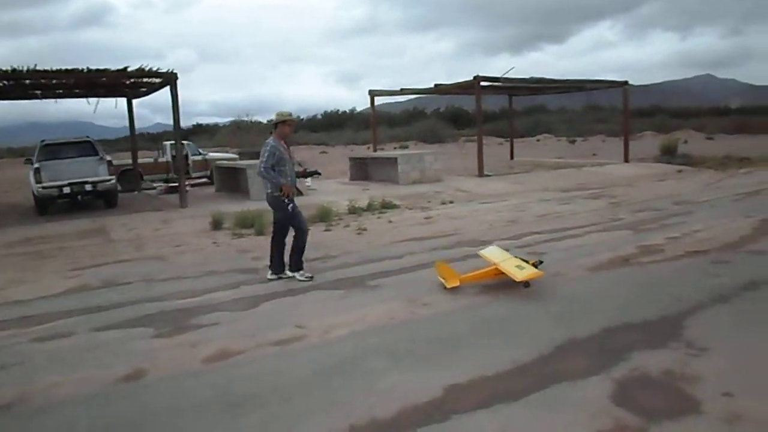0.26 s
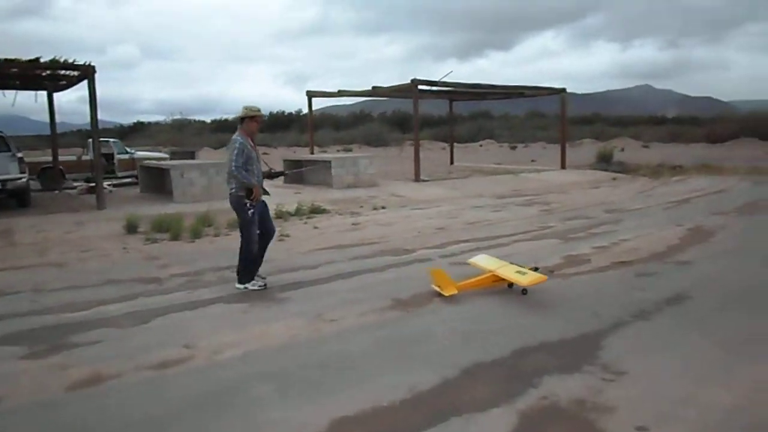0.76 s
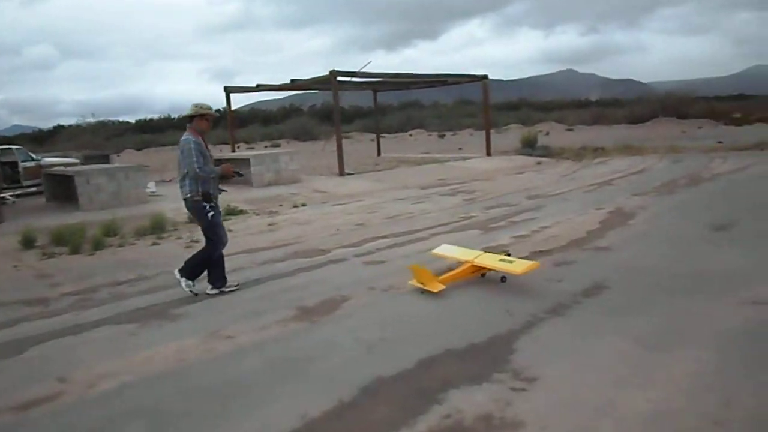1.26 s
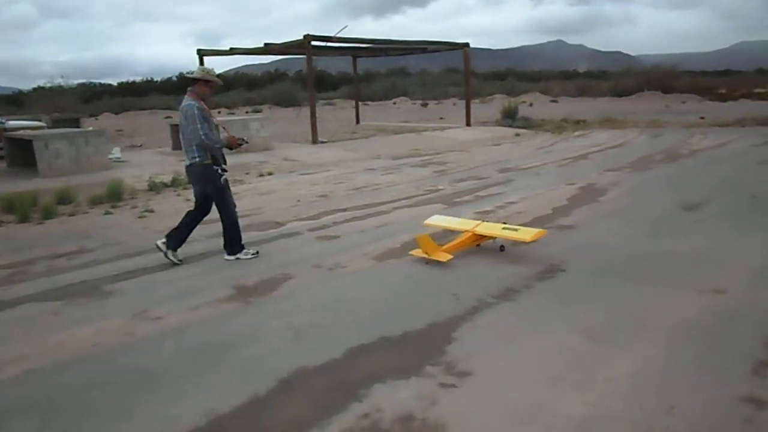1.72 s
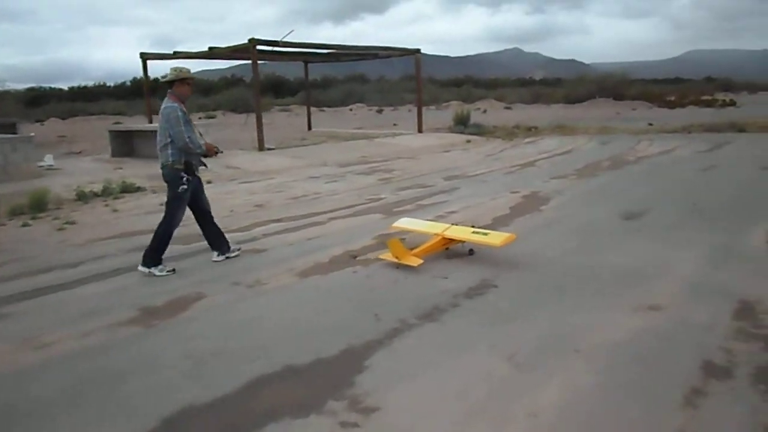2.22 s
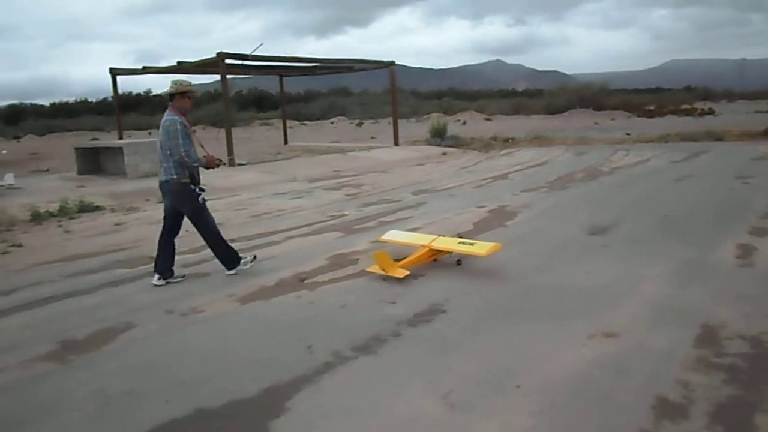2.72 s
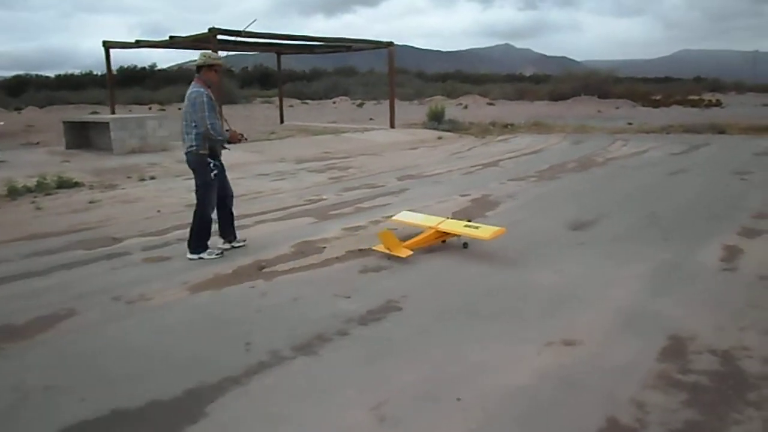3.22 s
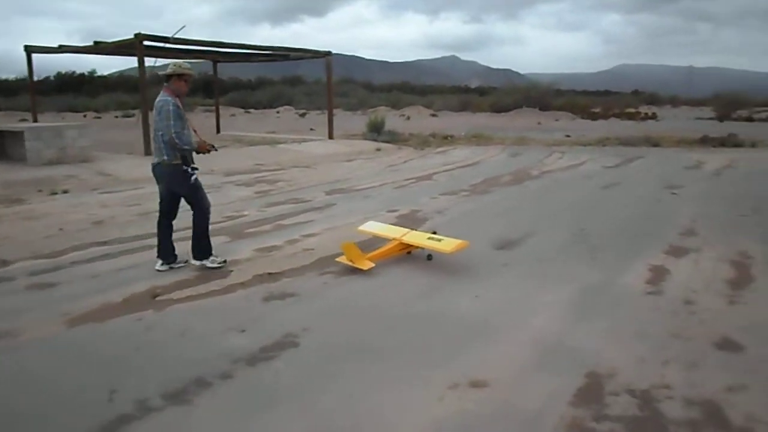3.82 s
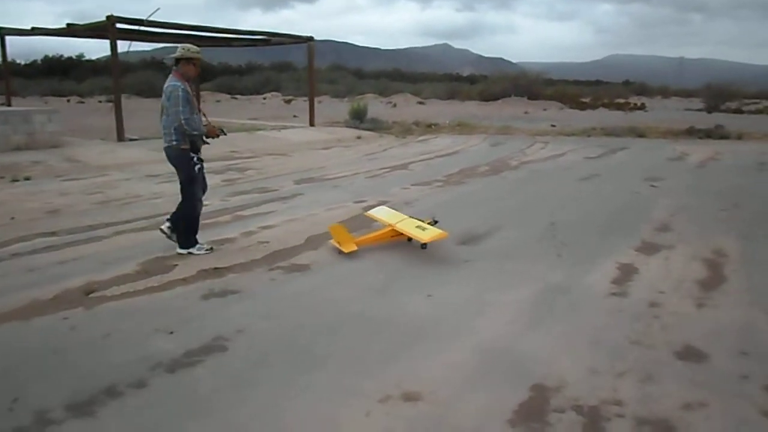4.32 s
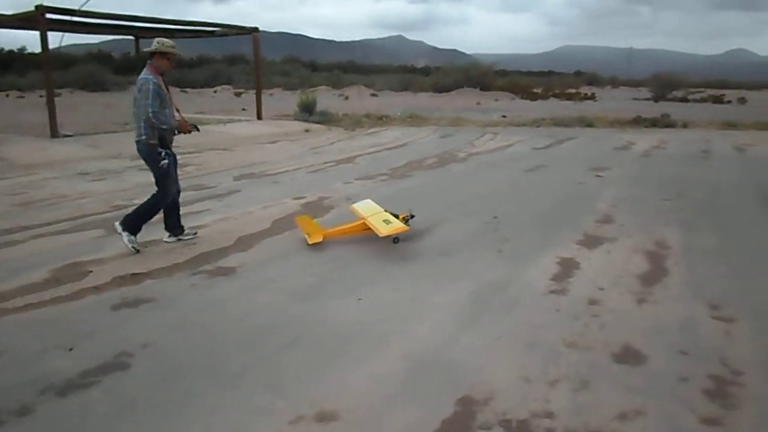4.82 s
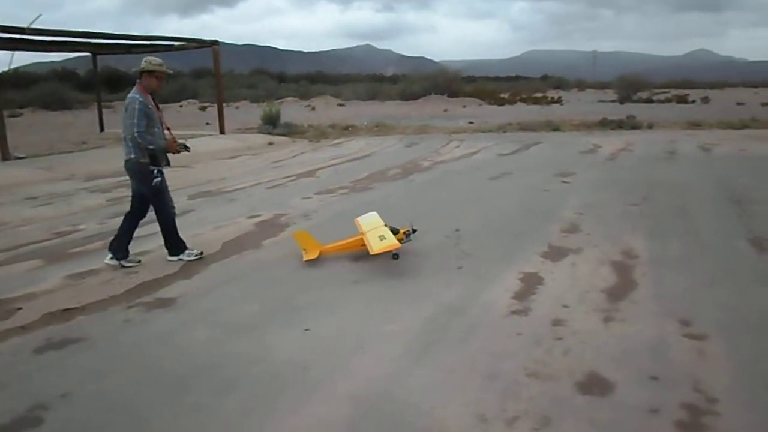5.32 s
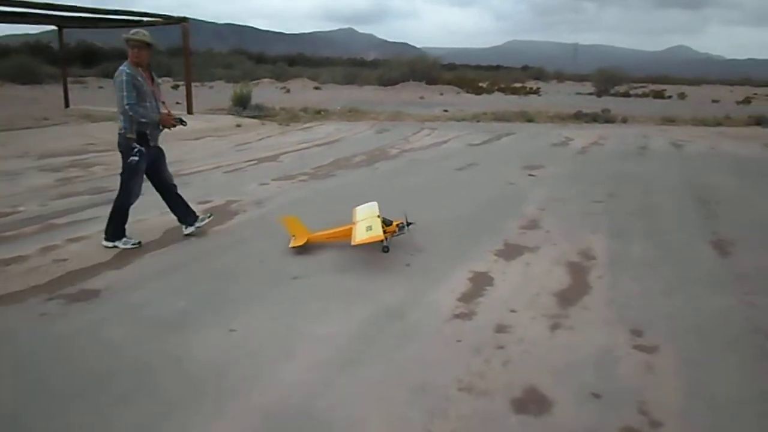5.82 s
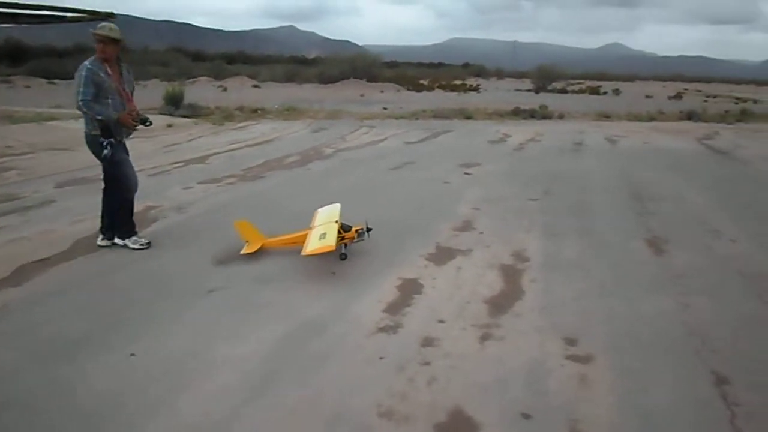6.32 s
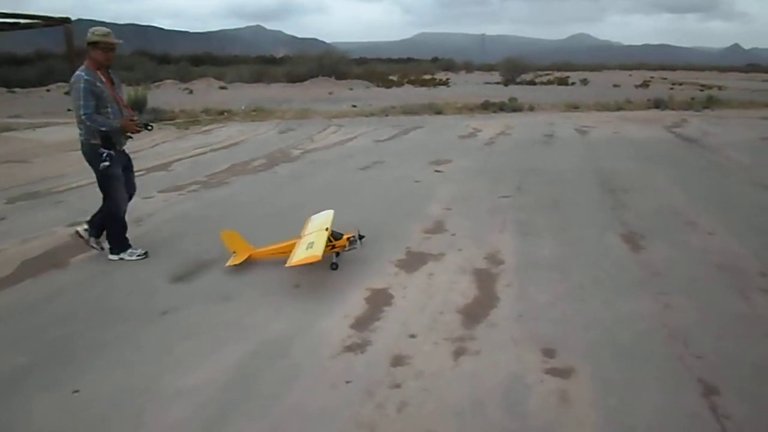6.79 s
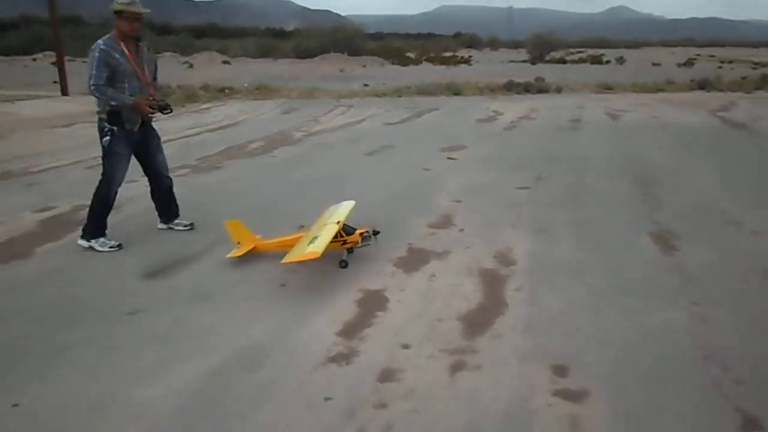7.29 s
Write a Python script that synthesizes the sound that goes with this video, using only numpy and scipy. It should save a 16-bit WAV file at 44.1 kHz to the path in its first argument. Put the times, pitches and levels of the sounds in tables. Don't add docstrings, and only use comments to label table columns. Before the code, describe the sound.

Rough, popping little model engine idles and surges on open ground, growing more rattly side-on, under buffeting gusts, finger knocks and a final muffled treble loss.

```python
import sys
import numpy as np
from scipy import signal
from scipy.fft import rfft, irfft, next_fast_len
from scipy.io import wavfile
from scipy.ndimage import uniform_filter1d, map_coordinates

SR = 44100
rng = np.random.default_rng(int(sys.argv[2]) if len(sys.argv) > 2 else 0)


def convert_level_to_amplitude(level_db):
    exponent = np.asarray(level_db, float) / 20
    return 10 ** exponent


def to_wav(s):
    ch = np.atleast_2d(s).T
    pcm = np.round(np.clip(ch, -1, 1) * 32767)
    wavfile.write(sys.argv[1], SR, pcm.astype(np.int16))


N = 332989
T = np.arange(N) / SR

# first t/s, last t/s, spacing/turns
STRONG_RUNS = [(.014, .036, 2), (.079, .165, 4), (.187, .218, 3), (.282, .314, 3), (.356, .419, 3),
               (.462, .504, 4), (.526, .559, 3), (1.232, 1.2636, 2), (1.356, 1.385, 2), (1.429, 1.4728, 3),
               (1.6266, 1.6404, 1), (1.696, 1.7103, 1), (1.9447, 2.0264, 5), (2.0595, 2.0933, 2),
               (2.1267, 2.1761, 1), (2.2438, 2.2601, 1), (2.4616, 2.4929, 2), (2.522, 2.563, 3),
               (2.588, 2.6127, 2), (2.6357, 2.6804, 2), (2.7126, 2.7747, 2), (2.805, 2.8354, 3),
               (2.8557, 2.886, 3), (3.142, 3.167, 2), (3.191, 3.2144, 2), (3.2374, 3.303, 2),
               (3.813, 3.928, 3), (4.7344, 4.7825, 2), (4.8162, 4.8378, 2), (4.8588, 4.8898, 3),
               (4.911, 4.9434, 3), (5.0344, 5.1047, 2), (5.1382, 5.1711, 3), (5.2029, 5.2335, 3),
               (5.253, 5.2908, 2), (5.3096, 5.3283, 1), (5.3468, 5.3746, 3), (5.771, 5.7865, 1),
               (5.915, 5.982, 4), (6.0327, 6.0672, 2), (6.118, 6.1684, 3), (6.2356, 6.2526, 1),
               (6.3029, 6.3353, 1), (6.3665, 6.3964, 2), (6.4404, 6.4547, 1), (6.4956, 6.6024, 4),
               (6.6407, 6.6668, 2)]
LONE_FIRINGS = [.6166, .849, .9273, 1.0108, 1.08, 1.1486, 1.199, 1.3102, 1.5154, 1.5567, 1.5987, 1.88,
                2.3278, 3.335, 3.772, 4.6217, 4.68, 4.9993, 5.2133, 5.403, 5.833, 6.5757, 6.7195]
# f/Hz, density/dB per Hz
TURBULENCE = [(150, -55), (230, -4), (350, -2), (550, -11.5), (900, -21.5), (1700, -39.5), (2500, -77)]


def unit(x):
    return x / np.sqrt(np.mean(x ** 2) + 1e-20)


def curves(rows):
    s, *cols = np.transpose(rows)
    return [np.interp(T, s, c) for c in cols]


def wobble(rate):
    return map_coordinates(rng.standard_normal(int(N * rate / SR) + 4), [T * rate])


def white():
    return rng.standard_normal(N)


def filtered(x, response):
    m = next_fast_len(N + SR // 2)
    return irfft(rfft(x, m) * response(np.fft.rfftfreq(m, 1 / SR)), m)[:N]


def shape(points):
    f, db = np.transpose(points)
    return lambda hz: convert_level_to_amplitude(np.interp(np.log(hz + 1), np.log(f + 1), db, left=-120, right=-120))


def causal(points, lean=1):
    def response(hz):
        cepstrum = irfft(np.log(shape(points)(hz) + 0.002))
        cepstrum[1:len(hz) - 1] *= 2
        cepstrum[len(hz):] = 0
        z = rfft(cepstrum)
        return np.exp(z.real + 1j * lean * z.imag)
    return response


def modes(table):
    def response(f):
        total = 0
        for k, (centre, width, db) in enumerate(table):
            damping = 1j * f * width
            total = total + (-1) ** k * convert_level_to_amplitude(db) * damping / (centre * centre - f * f + damping)
        return total
    return response


def noise(points):
    return unit(filtered(white(), shape(points)))


def steady(x, seconds):
    return x / np.sqrt(np.abs(uniform_filter1d(x ** 2, int(seconds * SR))) + 1e-12)


def swells(s, db, rise, fall):
    t = T[::32]
    total = 0
    for at, peak_db, up, down in zip(s, db, rise, fall):
        total = total + convert_level_to_amplitude(peak_db - 10 * np.maximum((at - t) / abs(up), (t - at) / abs(down)))
    return np.interp(T, t, total)


def engine():
    # t/s, share of the side view
    heading = [
        (4.2, 0.026),
        (4.8, 0.88),
    ]
    # t/s, pop level/dB, aim of the muffler/dB
    loudness = [(0, -56.5, 3), (.5, -51.5, 5), (.95, -51, -3), (1.65, -48.5, 1), (2.4, -51, 0.5),
                (2.62, -45, 2), (3.3, -46.5, 1.5), (3.69, -42, 2), (3.77, -39.5, -11), (4.3, -48.5, -7),
                (4.98, -43.5, -3.5), (5.36, -42, 1.5), (5.56, -42.5, -8), (6.03, -46.5, -1.5),
                (6.7, -40, -0.5), (7.02, -42, -6.5), (7.16, -52, 0), (7.55, -52, 9)]
    # t/s, burn of the charges/dB, draw of the intake/dB
    mixture = [(0, 6, 1.5), (.6, 4.5, 1), (1.2, 0.5, -3), (1.6, 1, -0.5), (2.3, 3, -0.5), (3.3, 3.5, 1.5),
               (3.42, -0.5, -1), (3.7, 1.5, -3.5), (4.0, -2.5, 0), (4.5, 0.5, -1.5), (5.0, 1, 2),
               (5.3, 2, -1.5), (5.42, -5, 0), (5.9, 1.5, 0), (6.1, 3, -0.5), (6.75, 3, 0.5), (7.0, -3, 3.5),
               (7.55, -20, 7)]
    # t/s, share of the intake in sight
    intake_view = [
        (0, 0.66),
        (.6, 0.42),
        (.68, 0),
        (4.2, 0),
        (4.8, 0.55),
        (7.1, 0.43),
        (7.16, 0.029),
    ]
    beside, = curves(heading)
    pop_db, aim_db = curves(loudness)
    burn_db, draw_db = curves(mixture)
    in_sight, = curves(intake_view)

    speed, turns = crank()
    fire = unit(firings(turns))
    opening = np.diff(np.floor(turns + .02), prepend=0) > 0
    ports = unit(opening * convert_level_to_amplitude(1.7 * wobble(66)))
    throttle_db = .09 * np.interp(T - .07, T, np.gradient(speed) * SR)
    burn = convert_level_to_amplitude(np.clip(throttle_db, -10, 1.5) + burn_db)
    blow = -np.roll(fire, round(.00205 * SR)) + .4 * unit(puffs(fire, .03, fill_db=2) * white())
    gulp = -ports + (.47 - .36 * in_sight + .3 * burn) * white()

    pop = exhaust_pop(blow, burn) + convert_level_to_amplitude(draw_db) * intake(gulp, in_sight)
    pop += convert_level_to_amplitude(-1.5) * wing_panel(blow, speed) + singing_intake(ports) + crack(fire, burn, beside)
    shake = cowl_slaps(fire, burn, ports)
    ring_db, rattle_db, hiss_db, hum_db = layers(beside)
    parts = pop + convert_level_to_amplitude(ring_db + aim_db) * muffler_ring(burn * blow + 2.1 * gulp, beside)
    parts += convert_level_to_amplitude(rattle_db) * cowl_rattle(shake) + convert_level_to_amplitude(hiss_db) * jet_hiss(shake, beside)
    return convert_level_to_amplitude(pop_db) * (parts + convert_level_to_amplitude(hum_db) * airframe_hum(speed, turns))


def crank():
    # t/s, speed the crank heads for/turns per s
    throttle = [(0.0, 93.4), (0.508, 56.8), (1.064, 67.6), (1.255, 74.0), (1.559, 59.4), (2.408, 106.1),
                (2.807, 62.3), (3.057, 106.9), (3.267, 61.2), (3.656, 92.9), (4.063, 57.2), (4.48, 78.8),
                (4.643, 110.6), (4.854, 68.9), (5.024, 117.5), (5.323, 58.5), (6.236, 80.4), (6.625, 55.6),
                (7.107, 83.4), (7.361, 62.5)]
    beats = [.6532, .746, 1.0455, 1.7543, 3.453, 3.5494, 3.578, 3.622, 3.757, 4.0533, 4.1545, 4.2426, 4.446,
             5.454, 6.85, 6.9466, 7.0427, 7.2468, 7.4389]
    s, aim = np.transpose(throttle)
    u = np.clip(T - s[1:, None], 0, None) / .1223
    speed = aim[0] + np.diff(aim) @ (1 - (1 + u) * np.exp(-u))
    turns = np.cumsum(speed) / SR
    s = np.unique([*np.transpose(STRONG_RUNS)[:2].flat, *beats, *LONE_FIRINGS])
    at = np.interp(s, T, turns)
    whole = np.cumsum(np.round(np.diff(at, prepend=0)))
    return speed, turns + uniform_filter1d(np.interp(T, s, whole - at), SR // 20)


def firings(turns):
    scatter_db, misfire_db, strong_db, strong_scatter_db = 11, -7, 10, 1.2
    at = np.flatnonzero(np.diff(np.floor(turns)) > 0)
    luck = rng.standard_normal((1000, 2))[:len(at)]
    size = convert_level_to_amplitude(scatter_db * np.clip(luck[:, 0], -2.5, .3))
    for first, last, apart in STRONG_RUNS + [(s, s, 1) for s in LONE_FIRINGS]:
        a, b = np.abs(T[at] - first).argmin(), np.abs(T[at] - last).argmin()
        strong = np.linspace(a, b, round((b - a) / apart) + 1).round().astype(int)
        at[a:b + 1] = np.linspace(first, last, b - a + 1) * SR
        size[a:b + 1] *= convert_level_to_amplitude(misfire_db)
        size[strong] = convert_level_to_amplitude(strong_db + strong_scatter_db * luck[strong, 1])
    train = np.zeros(N)
    train[at] = size
    return train


def puffs(train, t60, fill_db, rise_s=0.0019):
    t = T[:SR // 20]
    tail = convert_level_to_amplitude(-60 * t / t60) * (1 - np.exp(-t / rise_s))
    burst = signal.fftconvolve(train, tail)[:N]
    return unit(burst) + convert_level_to_amplitude(fill_db)


def exhaust_pop(blow, burn):
    # f/Hz, level/dB
    pop_tone = [(150, -11), (350, -10.5), (480, 2.5), (650, 7), (850, -3.5), (1050, -4), (1300, -8.5),
                (1600, -24.5), (1750, -12.5), (2100, -7), (2600, -29)]
    pop = steady(filtered(blow, causal(pop_tone, lean=.25)), .3)
    return convert_level_to_amplitude(-2.0) * burn * pop + convert_level_to_amplitude(-7) * noise(pop_tone)


def crack(fire, burn, beside):
    # f/Hz, level/dB
    front_tone = [(600, -31), (1500, -5), (3000, 1.5), (4500, -5.5), (7000, -30)]
    front = filtered(-np.roll(fire, round(.002 * SR)), shape(front_tone))
    return convert_level_to_amplitude(-16.5) * beside * burn * steady(front, .3)


def intake(gulp, in_sight):
    # f/Hz, width/Hz, level/dB
    throat = [(758, 129, -2.5), (1251, 74, 1)]
    # f/Hz, width/Hz, level/dB
    shadowed = [(1517, 170, 1.5)]
    sound = filtered(gulp, modes(throat)) + convert_level_to_amplitude(-10.5 + 10 * in_sight) * filtered(gulp, modes(shadowed))
    tone = [(300, -54.0), (600, 3.5), (800, 1.5), (1000, 4), (1250, 1.5), (1600, 5.5), (1800, 2.5)]
    return steady(filtered(sound, causal(tone)), 0.51)


def singing_intake(ports):
    # f/Hz, width/Hz, level/dB
    venturi = [(1250, 23, 0)]
    # t/s, level over the pop/dB, rise/s, fall/s
    sings = [
        (1.82, -8.5, 0.14, 0.13),
        (2.98, -11, 0.087, 0.056),
        (4.13, -6, 0.044, 0.11),
        (4.27, 0.5, 0.046, 0.18),
        (5.6, -7.5, 0.14, 0.42),
    ]
    song = filtered(0.22 * white() - ports, modes(venturi))
    return swells(*np.transpose(sings)) * steady(song, 0.021)


def wing_panel(blow, speed):
    # f/Hz, width/Hz, level/dB
    panel = [(233.2, 2, 0)]
    return steady(filtered(blow, modes(panel)), .3) * np.clip((speed - 62) / 30, 0, 1)


def muffler_ring(stir, beside):
    # f/Hz, width/Hz, level/dB
    closed_view = [(1896, 74, 4.5), (2210, 240, -8), (2560, 600, -7)]
    # f/Hz, width/Hz, level/dB
    open_view = [(1920, 96, 4), (2312, 170, 4.5), (2245, 140, -11)]
    ring = (1 - beside) * filtered(stir, modes(closed_view)) + beside * filtered(stir, modes(open_view))
    ring = filtered(ring, causal([(1550, -60.0), (1800, -7.0), (2600, -15.5), (3000, -15.0)]))
    return steady(ring, 0.34)


def cowl_slaps(fire, burn, ports):
    # t/s, level/dB
    slaps = [(5.035, 5), (5.239, 5), (5.558, 2), (5.571, 3), (5.583, 3), (5.596, 3), (5.609, 4), (5.622, 4),
             (5.675, -6), (6.033, 4), (6.068, 6), (6.118, 6), (6.169, 7), (6.236, 3), (6.253, 6),
             (6.27, -5), (6.287, -5), (6.304, 4), (6.336, 4), (6.367, 4), (6.385, 5), (6.412, -9),
             (6.456, 4), (6.469, -6), (6.482, 7), (6.51, -6), (6.522, 7), (6.575, 5), (6.603, 4),
             (6.641, 3), (6.667, 2), (6.706, 2), (6.733, -5), (6.746, 2)]
    slap_db = sum(db * (np.abs(T - s) < .005) for s, db in slaps)
    return np.roll(bounces(.2 * burn * fire + convert_level_to_amplitude(slap_db) * ports), SR // 800)


def bounces(train):
    gap_s, loss_db, loose, scatter_db = .0046, (0, -4.5, -11), .13, 2.6
    at, out = np.flatnonzero(train), np.zeros(N + SR)
    luck = np.clip(rng.standard_normal((2000, len(loss_db), 2))[:len(at)], -2.5, 1.5)
    for k, db in enumerate(loss_db):
        lag = np.round(k * gap_s * SR * (1 + loose * luck[:, k, 0])).astype(int)
        out[at + lag] += train[at] * convert_level_to_amplitude(db + scatter_db * luck[:, k, 1])
    return out[:N]


def cowl_rattle(shake):
    # f/Hz, width/Hz, level/dB
    cowl = [(2838, 140, 2.5), (3286, 182, 7.5), (3435, 190, 7), (3786, 137, 6), (4030, 270, 1.5),
            (4270, 160, 0)]
    scrape = unit(puffs(shake, .005, fill_db=-13) * white())
    rattle = filtered(-unit(shake) + .4 * scrape, modes(cowl))
    tone = [(2000, -11), (2500, -4), (2800, -5), (2980, -14), (3150, -2.5), (3600, -5),
            (4350, -6), (4550, -16.5), (5200, -14)]
    return steady(filtered(rattle, shape(tone)), 0.14)


def jet_hiss(shake, beside):
    # f/Hz, density/dB per Hz
    behind_tone = [(2650, -57), (4500, -3.5), (5200, -9), (6140, -1.5), (6460, 1.5), (7150, -9),
                   (8080, -14.5), (9680, -12), (10400, -20.5), (11500, -62), (15000, -74), (22000, -120)]
    # f/Hz, density/dB per Hz
    beside_tone = [(2650, -24), (4500, -3), (4610, -6.5), (5870, -4), (6920, -10), (7630, -4.5), (8910, -3),
                   (10200, -8.5), (11100, -22.5), (12000, -26), (15600, -73), (22000, -120)]
    gas = np.roll(puffs(shake, 0.0094, fill_db=-7.5, rise_s=0.0017), -SR // 2000) * white()
    jet = np.abs(1 - beside) * unit(filtered(gas, shape(behind_tone)))
    jet += np.abs(beside) * unit(filtered(gas, shape(beside_tone)))
    return steady(jet, 0.85)


def airframe_hum(speed, turns):
    # f/Hz, level/dB
    airframe = [(50, -16), (100, -7), (150, -3), (190, 0), (235, -1), (290, -9), (330, -16), (390, -17),
                (500, -30)]
    # t/s, level/dB
    humming = [(0, 2), (1.5, 0.5), (2.5, 0.5), (3.6, 0), (3.72, -3), (3.92, -11), (4.15, -3), (4.65, -1),
               (4.95, -0.5), (5.5, -1.5), (6.5, 1.5), (7.55, -1)]
    gain, even = shape(airframe), np.cumsum(speed) / SR
    turns = even + uniform_filter1d(turns - even, SR // 8)
    tone = 0
    for k, db in [(1, 0), (2, 0), (3, -2), (4, -2), (5, -5), (6, -4)]:  # order, level/dB
        level = convert_level_to_amplitude(db + 1.2 * wobble(9)) * gain(k * speed)
        tone = tone + level * np.sin(2 * np.pi * k * turns + 0.13 * wobble(7.7))
    return convert_level_to_amplitude(2.5 + curves(humming)[0]) * tone


def layers(beside):
    # t/s, level/dB, half length/s
    jolts = [(0.704, 13.5, 0.058), (1.08, 1, 0.14), (1.598, 4.5, 0.29), (2.58, 7.5, 0.52), (2.56, 3, 0.043),
             (2.783, 3, 0.027), (3.072, 5, 0.037), (3.153, 6.5, 0.069), (3.144, 8, 0.35),
             (3.484, 10.5, 0.098), (3.89, 24, 0.28), (4.252, 22.5, 0.28), (4.663, 9.5, 0.36),
             (5.178, 6.5, 0.22), (5.598, 11.5, 0.1), (6.11, 10, 0.27), (6.496, 12, 0.37),
             (6.697, 10.5, 0.14), (7.054, 8, 0.021), (7.346, 7, 0.061)]
    jolt_db = sum(db * np.clip(1 - np.abs(T - s) / half, 0, 1) for s, db, half in jolts)
    ring, rattle, jet, hum = (-10, -10, 0.38), (-26.5, -5.5, 1), (-20, -11, 0.75), (8.45, 3.8, 0.1)
    return [behind_db + (side_db - behind_db) * beside + share * jolt_db
            for behind_db, side_db, share in (ring, rattle, jet, hum)]


def handling():
    # t/s, peak level/dB, ring f/Hz, t60/s, share
    knocks = [(3.517, -33.5, 1980, 0.035, 0.69), (3.606, -37, 4000, .003, 0.95),
              (3.611, -42, 4000, 0.0036, 0.93), (3.632, -31.5, 4970, 0.0028, 0.45),
              (3.638, -32, 4530, 0.01, 0.51), (3.647, -32, 6000, 0.0051, 0.93),
              (3.676, -38.5, 4900, 0.058, 0.79), (3.6916, -15.5, 1500, 0.0032, 0.24),
              (4.341, -41.5, 7200, 0.012, 0.5), (4.342, -56, 1990, 0.013, 0.23),
              (3.621, -33, 2320, 0.0071, 0.26), (3.639, -26, 1720, 0.01, 0.15),
              (6.2258, -10, 10050, 0.014, 0.15), (6.2259, -26, 5040, 0.027, 0.68),
              (7.472, -10, 860, 0.0034, 0.12), (7.5485, -43, 3010, 0.003, 0.87)]
    # t/s, peak level/dB, ring f/Hz, t60/s, share of scrape
    snaps = [
        (3.6611, 1, 3600, .0013, .15),
        (3.6613, -13, 1100, .005, .1),
        (3.6617, -7, 2000, .005, .25),
        (3.6953, 1, 600, .0028, .12),
        (3.6956, -14, 9000, .0008, .5),
    ]
    # t/s, peak level/dB, length/s (negative pulls)
    pushes = [
        (3.662, -15, .02),
        (3.672, -13.5, .018),
        (3.684, -22, .014),
        (3.6957, -13, .0022),
        (3.697, -14, -.006),
        (3.698, -14, -.016),
        (3.7, -17, -.04),
        (5.625, -15, 0.0081),
        (7.477, -15, 0.0099),
    ]
    out, t = np.zeros(N + SR), T[:SR // 4]
    for s, db, hz, t60, scrape in knocks + snaps:
        click = (1 - scrape) * np.sin(2 * np.pi * hz * t) + 1.2 * scrape * rng.standard_normal(len(t))
        out[round(s * SR):][:len(t)] += convert_level_to_amplitude(db - 60 * t / t60) * click * (1 - np.exp(-t / .0001))
    out = filtered(out[:N], causal([(10, 10.0), (6000, 4), (10500, -15.5), (16000, -52)]))
    for s, db, length in pushes:
        u = np.clip(T - s, 0, None) / abs(length)
        out += np.sign(length) * convert_level_to_amplitude(db) * np.e * 2 * u * np.exp(-2 * u)
    return out


def wind():
    # t/s, rumble level/dB, flutter over it/dB, rise/s, fall/s
    gusts = [(0.152, -26.5, 0.5, 0.14, 0.16), (.4, -28.5, -31, 0.13, 0.79), (.7, -23.5, -1, 0.47, 0.2),
             (1.5, -19.5, -2, 0.25, 0.22), (1.759, -12.5, -8, 0.026, 0.14), (2.25, -25, 0.5, 0.023, 0.1),
             (2.801, -27, 4.5, 0.57, 0.46), (3.17, -22.5, -2, 0.26, 0.3), (3.661, -15, -2, 0.14, 0.085),
             (3.95, -5.5, -9.5, 0.079, 0.18), (4.2, -25, -27, 0.087, 0.062),
             (4.42, -6.5, -7.5, 0.083, 0.19), (4.601, -18, 6, 0.21, 0.019), (5.32, -31.5, 4, 0.49, 0.12),
             (5.442, -22, -20, 0.077, 0.024), (5.638, -12.5, -2, 0.069, 0.083),
             (6.14, -24, -13.5, 0.076, 0.29), (6.5, -29.5, 7, 0.45, 0.23), (6.77, -23, -3.5, 0.19, 0.047),
             (7.069, -13.5, -1, 0.024, 0.25), (7.13, -27.5, -5, 0.056, 0.26), (7.42, -15, -1, 0.33, 1)]
    # t/s, level/dB, rise/s, fall/s
    whips = [
        (3.941, -28, 0.0043, 0.0086),
        (3.968, -22, 0.0056, 0.018),
        (4.034, -19.5, .012, 0.0082),
        (4.098, -20, .01, 0.005),
        (4.18, -36, 0.0062, 0.0083),
        (4.242, -31, 0.0055, 0.015),
        (4.395, -17, 0.01, 0.012),
        (7.278, -28, 0.033, 0.017),
        (7.4, -21, 0.016, 0.025),
        (7.52, -30.5, 0.0077, 0.044),
    ]
    # f/Hz, density/dB per Hz
    rumble_tone = [(8, -1), (18, 5.5), (40, -9.5), (70, -11), (110, -59)]
    # f/Hz, density/dB per Hz
    flutter_tone = [(45, -13), (75, -3.5), (130, -14), (200, -13), (300, -21.5)]
    breeze_db, breeze_flutter_db = -41, -9.5
    s, db, over_db, rise, fall = np.transpose(gusts)
    slow = convert_level_to_amplitude(breeze_db) + swells(s, db, rise, fall)
    fast = convert_level_to_amplitude(breeze_db + breeze_flutter_db) + swells(s, db + over_db, 0.64 * rise, 0.84 * fall)
    lumps = wobble(25)
    rumble = convert_level_to_amplitude(-5.5) * slow * steady(noise(rumble_tone), 0.2)
    flutter = convert_level_to_amplitude(-7.5) * fast * steady(convert_level_to_amplitude(2.74 * lumps) * noise(flutter_tone), 0.1)
    spikes = steady(convert_level_to_amplitude(2 * lumps + 6 * wobble(70)) * noise(TURBULENCE), .06)
    return rumble + flutter + (convert_level_to_amplitude(-22) * fast + swells(*np.transpose(whips))) * spikes


def eddies():
    # t/s, peak level/dB, f/Hz
    thumps = [(0.707, -27.5, 118), (1.526, -22, 150), (2.614, -32.5, 176), (3.644, -35, 170),
              (3.681, -30, 200), (3.6869, -23, 215), (4.397, -34, 414), (4.527, -24, 91), (7.192, -28, 380),
              (3.942, -40, 192), (4.029, -41.5, 123), (4.089, -38.5, 134), (4.175, -46, 125),
              (4.238, -41, 121), (4.339, -40, 121), (4.357, -30.5, 182), (4.392, -26.5, 158),
              (4.432, -28, 159), (4.551, -32, 177), (4.581, -24.5, 220), (5.319, -29, 99),
              (5.43, -27, 122.5), (5.628, -34, 105), (5.637, -23.5, 108), (5.643, -20.5, 220),
              (5.701, -69, 207), (7.047, -20, 34), (7.111, -14, 136), (7.122, -30, 110),
              (7.145, -20.5, 100), (7.162, -23, 70.6), (7.181, -22, 133), (7.198, -19, 127),
              (7.241, -17.5, 139), (7.284, -19, 222), (7.324, -21.5, 156.6), (7.382, -24.5, 193),
              (7.469, -26, 162), (7.5, -29.5, 310)]
    whistles = [
        (0.846, 0.877, 1630, 2000, -68),
        (0.857, 0.93, 2050, 2130, -55),
        (4.372, 4.475, 1060, 1100, -53.5),
    ]
    out, t = np.zeros(N + SR), T[:SR // 8]
    turbulence = np.pad(noise(TURBULENCE), (0, SR))
    for s, db, hz in thumps:
        first, u = round(s * SR), t * hz
        out[first:][:len(t)] += convert_level_to_amplitude(db + 11.5) * u * np.exp(-2.2 * u) * np.sin(2 * np.pi * u) * 4
        spray = convert_level_to_amplitude(db - 16 - 60 * t / 0.11) * np.tanh(t / 0.0013)
        out[first:][:len(t)] += spray * turbulence[first:][:len(t)]
    for start, stop, from_hz, to_hz, db in whistles:
        u = np.clip((T - start) / (stop - start), 0, 1)
        phase = 2 * np.pi * np.cumsum(from_hz + (to_hz - from_hz) * u) / SR
        out[:N] += convert_level_to_amplitude(db) * np.sin(np.pi * u) * np.sin(phase)
    return out[:N]


def steady_chirr():
    # f/Hz, density/dB per Hz
    chirr = [(3100, -19), (3250, -7.5), (3420, -8.5), (3600, -6.5), (3800, -38)]
    swell = np.cos(np.pi * 30 * (T - 1.952)) ** 2
    return convert_level_to_amplitude(-70 + 0.67 * wobble(30.27)) * unit((0.4 + swell) * noise(chirr))


def ducking():
    since, clamp_s, recover_s = T - 3.7, 0.0062, 1.59
    return convert_level_to_amplitude(-24 * np.clip(np.minimum(since / clamp_s, 1 - since / recover_s), 0, 1))


def scene():
    return (ducking() * (engine() + wind() + steady_chirr()) + eddies() + handling())[None]


def treble_dropout(x):
    slips = [
        (7.042, 7.087, 2130),
        (7.084, 7.142, 2030),
        (7.055, 7.141, 3180),
        (7.05, 7.135, 3720),
        (7.374, 7.446, 3180),
        (7.375, 7.403, 3700),
    ]
    # f/Hz, density/dB per Hz
    hiss_tone = [(300, -10), (2000, -3), (9500, -3.5), (10800, -10.5), (12000, -41), (12600, -56)]
    starve_s, end_s, bass_hz = 6.972, 7.55, 1730

    def gate(start, stop):
        return np.clip(np.minimum(T - start, stop - T) / 0.0088, 0, 1)

    treble = filtered(x, lambda hz: hz > bass_hz)
    kept = 0
    for start, stop, centre in slips:
        kept = kept + gate(start, stop) * filtered(treble, lambda hz: np.abs(hz - centre) < 70)
    hiss = convert_level_to_amplitude(-74.0 + 10.1 * gate(starve_s, 9)) * noise(hiss_tone)
    return x - gate(starve_s, end_s) * treble + convert_level_to_amplitude(12.0) * kept + hiss


def roll_off(x):
    return signal.sosfilt(signal.butter(12, 12120, fs=SR, output="sos"), x)


def record(dry):
    x = dry[0] / (1 + np.abs(dry[0] / .74) ** 6) ** (1 / 6)
    mix = treble_dropout(x)[None]
    return roll_off(mix)


dry = scene()
out = record(dry)
to_wav(out)
```